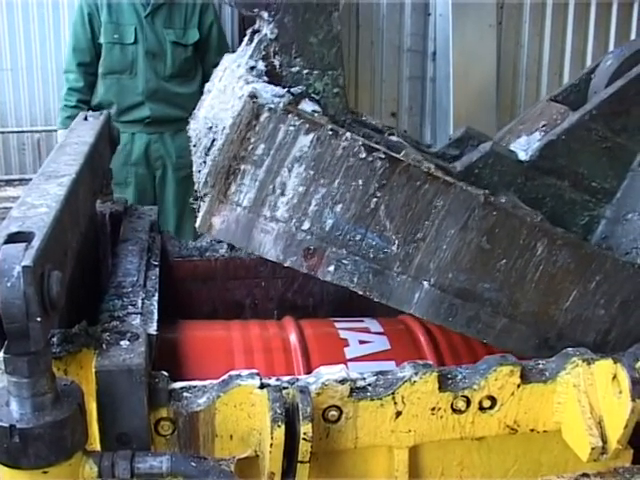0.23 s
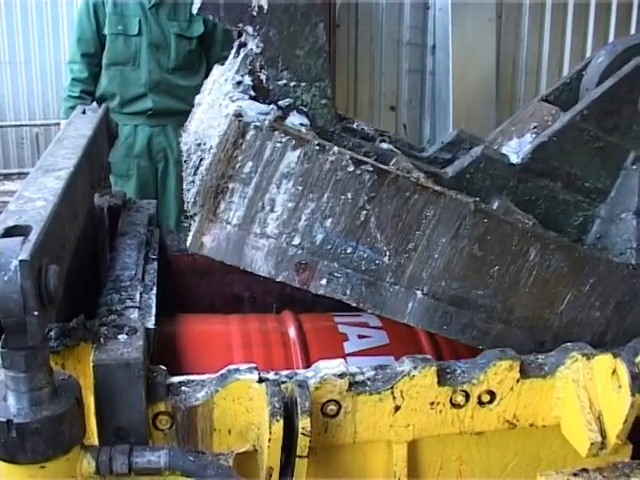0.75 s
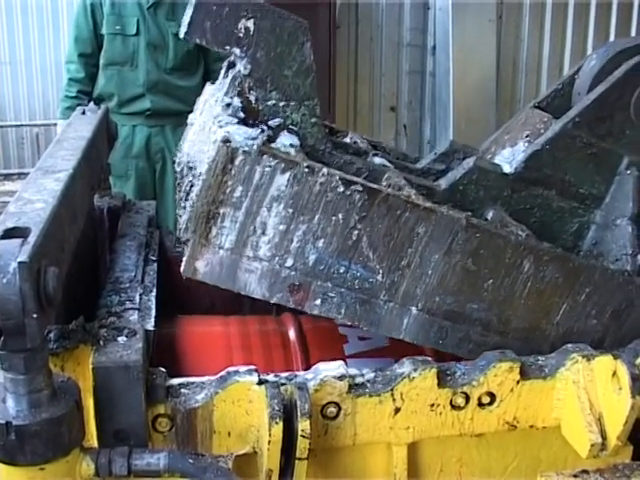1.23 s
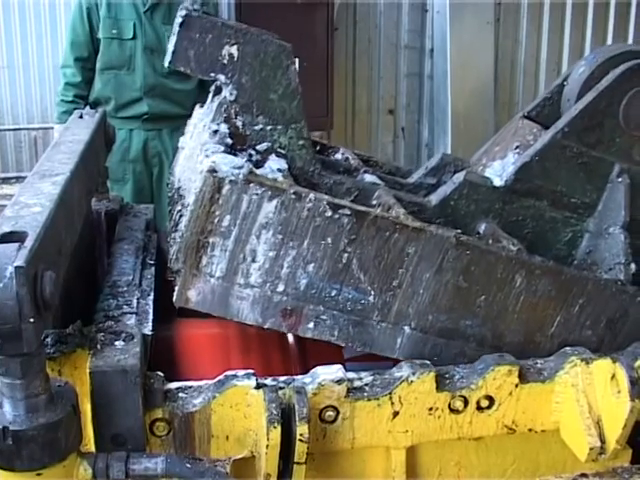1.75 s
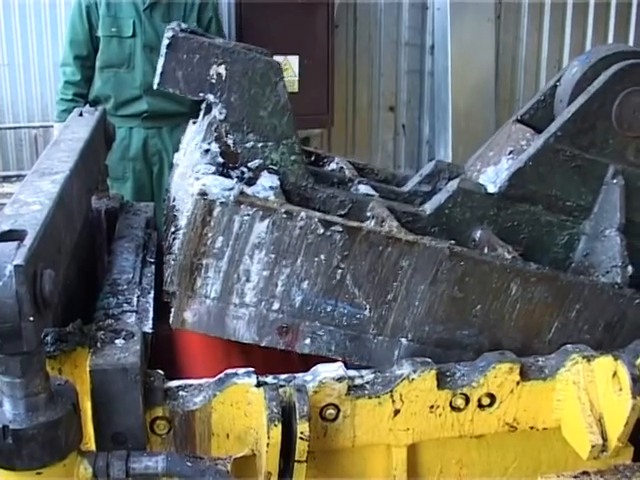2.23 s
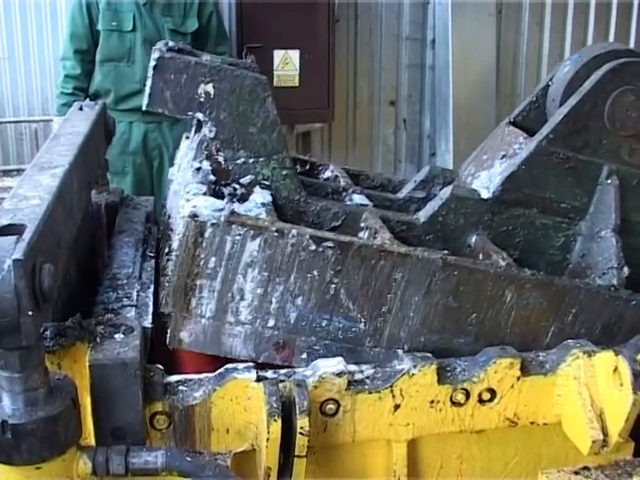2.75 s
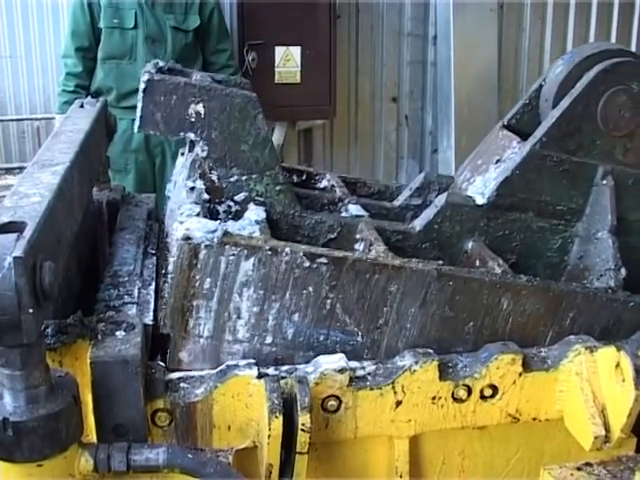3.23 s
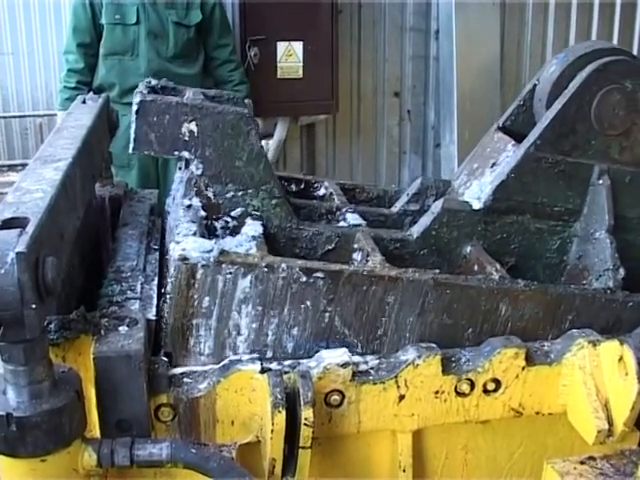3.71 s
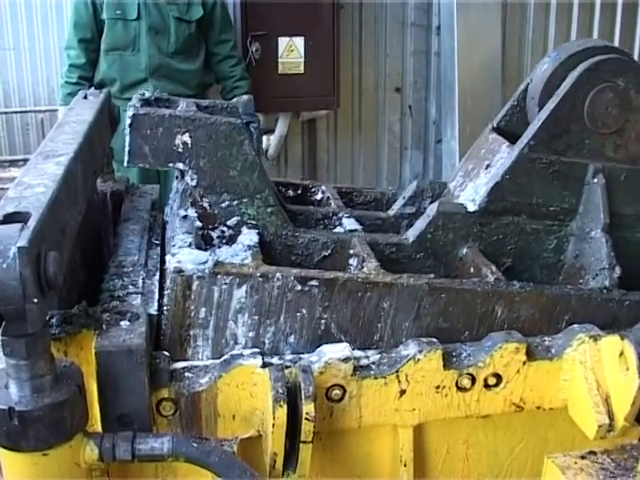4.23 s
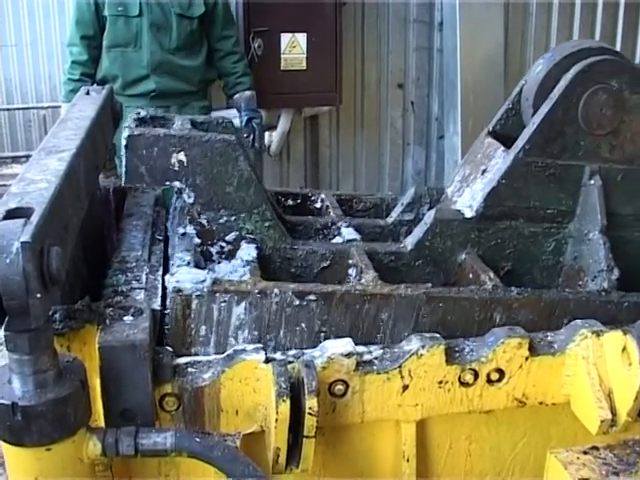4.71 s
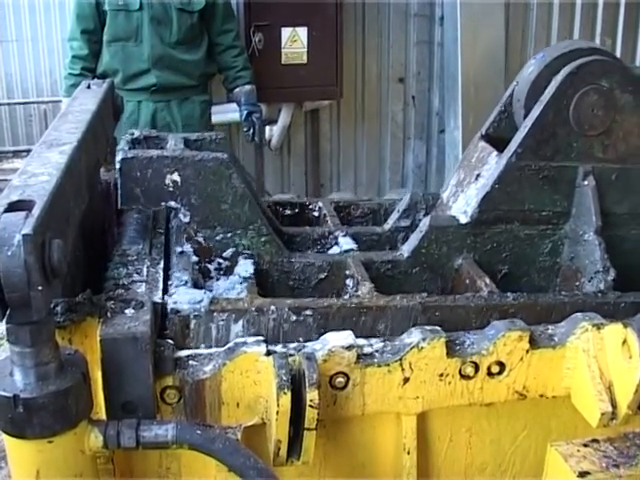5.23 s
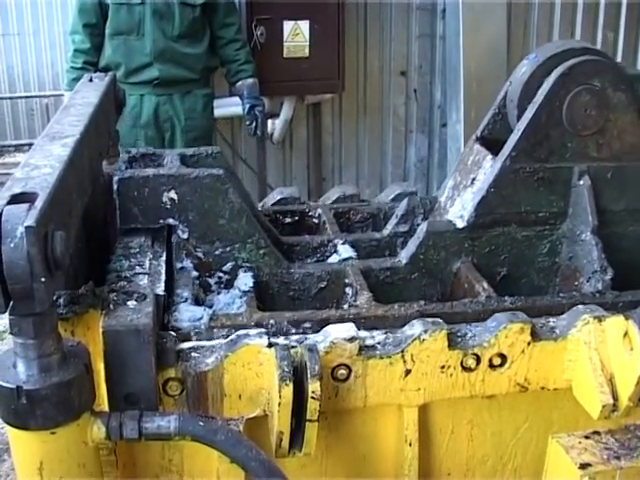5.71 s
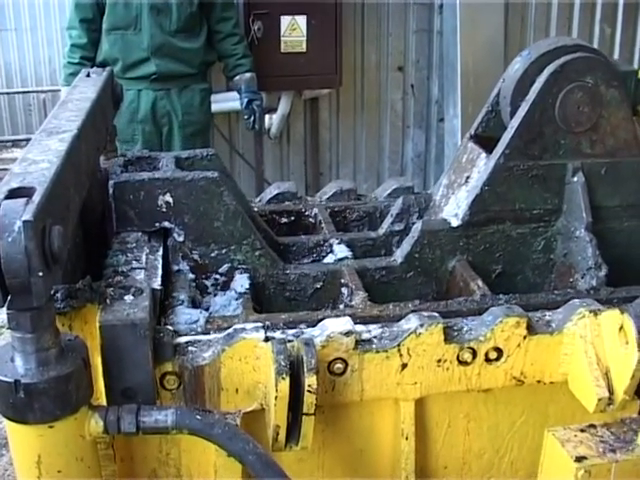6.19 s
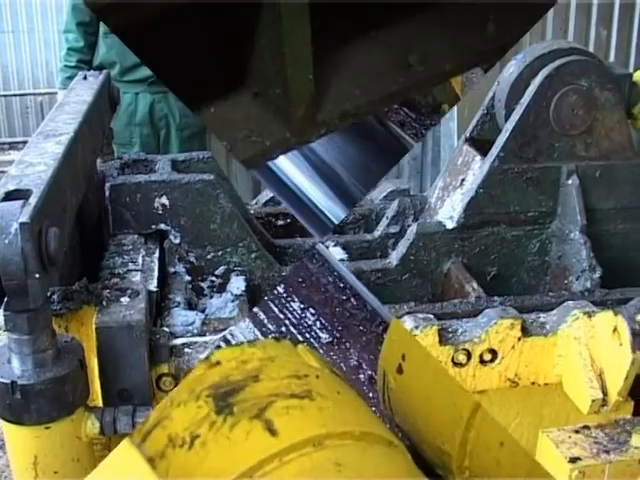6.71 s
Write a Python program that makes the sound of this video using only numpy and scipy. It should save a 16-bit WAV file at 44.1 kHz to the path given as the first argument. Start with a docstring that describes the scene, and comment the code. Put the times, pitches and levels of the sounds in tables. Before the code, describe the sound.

A scrap press closes its lid on a steel drum in a yard. Its pump and second shaft drone and whine steadily over hissing oil flow. After about four seconds light ticks and dull groans begin, then a bright crack opens a heavy metallic buckling knock. Sheet crinkles and snaps, a second multiple knock lands, a short bright hiss follows, and everything stops abruptly. Close, dry, mono pickup.

```python
"""A hydraulic scrap baler closes its lid on a steel drum.
A ten-stroke pump and a second, slightly slower shaft drone as harmonic series with added whines, over a rush
of oil made of filtered noise. The frame groans and knocks dully in wavering tones, and the drum ticks and
crinkles in noise bursts. Twice the drum buckles with a heavy knock of noise and decaying modes, the first
opened by a bright crack. A short hiss follows, and the sound ends abruptly."""
import sys
import numpy as np
from scipy.fft import rfft, irfft, next_fast_len
from scipy.io import wavfile
from scipy.ndimage import uniform_filter1d, minimum_filter1d, map_coordinates

SR = 44100
rng = np.random.default_rng(int(sys.argv[2]) if len(sys.argv) > 2 else 0)


def to_wav(s):
    """Save 16-bit WAV."""
    ch = np.atleast_2d(s).T  # columns
    pcm = np.round(np.clip(ch, -1, 1) * 32767)  # PCM
    wavfile.write(sys.argv[1], SR, pcm.astype(np.int16))


N = 306567

# Oil pressure, rising as the lid meets the drum: time_s, load (0-1)
PRESSURE_LOAD = [(0, 0), (1.5, 0.23), (4.3, 0.17), (4.95, .85), (6.3, 1)]
# Oil rush in the housing: frequency_hz, relative_density_db
HOUSING_BODY = [(25, -54), (70, -53.5), (100, -38.5), (130, -47.5), (162, -38), (180, -24), (215, -22.5),
                (300, -6.5), (450, -13.5), (650, -5), (800, 1.5), (1150, -9), (1650, -4.5), (2100, -14.5),
                (4400, -21.5), (6500, -38.5)]
# Resonances and dips of the housing: centre_hz, width_hz, gain_db
HOUSING_HUMPS = [(786, 77.8, 4.5), (902, 110, 5), (1477, 72, 7), (2702, 160, 6.5), (3080, 330, -4.5),
                 (3504, 146, 7.5), (3847, 200, 6.5), (4410, 160, 6), (5150, 860, -3.5), (5900, 350, 8)]
# Fizz in the pipes: frequency_hz, relative_density_db
PIPE_FIZZ = [(2940, -37.5), (5000, -7), (5390, -4.5), (5850, 1), (6220, -6), (6830, -17), (7660, -9),
             (8460, -22), (9210, -9), (10000, -19.5), (10700, -6.5), (11100, -8.5), (13100, -13.5),
             (14900, -25.5), (15500, -35.5)]
# Rumble of the strained frame: frequency_hz, relative_density_db
FRAME_STRAIN = [(50, -32), (100, -13.5), (160, -12.0), (230, 3.5), (500, 19.0), (900, -38.0)]
# Harmonics of the pump shaft, before trim: order (multiple of shaft rate), level_db
PUMP_ORDERS = [(14, -43), (24, -41), (25, -41), (28, -35), (30, -35), (32, -28), (33, -35), (36, -35),
               (40, -27), (41, -42), (42, -44), (45, -43), (47, -43), (48, -41), (49, -42), (60, -41),
               (64, -42), (70, -37), (80, -43), (100, -49), (110, -48), (120, -48), (130, -52), (150, -52),
               (160, -52)]
# Harmonics of the second shaft, before trim: order (multiple of shaft rate), level_db
MOTOR_ORDERS = [(12, -40), (13, -45), (15, -47), (16, -47), (27, -40), (28, -43), (30, -39), (32, -30),
                (34, -27), (36, -36), (40, -32), (44, -36), (45, -31), (60, -38), (80, -47)]
# Whines that follow the second shaft's speed, before trim: nominal_pitch_hz, level_db
MOTOR_WHINES = [(593, -42), (607, -43), (643, -40), (763, -33), (775, -37), (793, -31), (890, -37),
                (911, -31), (1002, -31), (1072, -37), (1443, -37), (1484, -37), (1888, -44), (2146, -48),
                (2714, -48)]
# Slowly beating pump overtones: order, level_db, depth (0-1), beat_period_s, first_crest_s
BEATING_ORDERS = [(20, -32, .5, .75, .17), (50, -30.5, .42, 1.03, 0)]
# Closing hiss: frequency_hz, relative_density_db
HISS_SPECTRUM = [(500, -22.5), (2000, 7.5), (4000, 4), (6500, -12), (9000, -12.5), (11000, -1.5),
                 (13000, -8), (15500, -15)]
# Groans and dull low knocks of the strained frame: start_s, level_db, pitch_hz
FRAME_GROANS_AND_KNOCKS = [(4.0, -35, 192), (4.31, -50, 105), (4.53, -45, 105), (4.745, -19.5, 400),
                           (4.872, -23.5, 115), (4.95, -20.5, 215), (5.08, -39.5, 150), (5.24, -28, 297),
                           (5.67, -45, 130), (5.77, -42, 110), (5.88, -43, 120), (5.93, -20, 236.3),
                           (5.96, -31, 175)]
# Single creases that snap: start_s, level_db, panel_ring_db (relative to the snap)
CREASE_SNAPS = [(4.098, -26, 2), (4.348, -30, -3), (4.885, -41, -0.5), (5.102, -33, 13.5),
                (5.279, -39, 15.5), (5.427, -32, -11), (5.705, -31.5, -4), (5.815, -36, -3)]
# Spells of crinkling sheet: start_s, length_s, level_db
CRINKLE_SPELLS = [(5.247, 0.16, -36.5), (5.66, 0.33, -42), (5.997, 0.079, -37.5)]
# Colour of snaps and crinkles: frequency_hz, relative_density_db
SNAP_SPECTRUM = [(800, -19), (2400, 7.5), (3200, 6.5), (4800, -4.5), (6000, -2), (8000, -9.5),
                 (11000, -6.5), (15000, -23.5)]
# Small panels between the folds: centre_hz, width_hz, gain_db
PANEL_MODES = [(2170, 70, -4), (2420, 90, -1), (2560, 70, -3), (3230, 160, 0), (4170, 120, -7)]
# Crack of the first buckle: frequency_hz, relative_density_db
CRACK_SPECTRUM = [(200, -9.5), (600, -0.5), (1200, 2), (2600, -10), (5000, -25), (9000, -41.5),
                  (15000, -40)]
# Jolts of the buckling drum: start_s, level_db, rise_s, t60_s, boom_db, brightness_db, thud_db
JOLTS = [(4.872, -7.5, .0004, 0.49, 1.5, -4, -48), (4.905, -11, .004, 0.5, -2, -5, -52),
         (4.935, -9, 0.0036, 0.57, 1, -6, -46), (5.21, -18, .005, 0.16, -2, -5.5, -54),
         (5.265, -21.5, .005, 0.18, -3, 5, -70), (6.033, -9.5, 0.0015, 0.3, -7, -3, -38.5),
         (6.056, -7.5, .001, 0.25, -9.5, -8, -35), (6.098, -11, .001, 1, -9.5, -8.5, -50)]
# Modes of the drum, before random spread: pitch_hz, level_db, t60_s
DRUM_MODES = [(235, -12, .3), (335, -6, .25), (430, -5, .25), (545, -7, .2), (625, -1, .3), (690, -1, .3),
              (760, -2, .3), (875, -1, .3), (1020, -4, .2), (1390, -10, .2), (1560, -12, .2),
              (2050, -15, .15), (2380, -14, .15)]
# Crumpling sheet: frequency_hz, relative_density_db
CRUMPLE_SPECTRUM = [(60, -36), (150, -21), (230, -9), (360, -1), (500, -2), (650, 4), (1000, 2), (1300, -6),
                    (1700, -10), (2400, -13), (4000, -27), (8000, -45), (15000, -58)]
# Thud of the frame: frequency_hz, relative_density_db
THUD_SPECTRUM = [(15, -4), (35, 0), (60, -4), (100, -6), (160, -11), (300, -30)]

PUMP_HZ, MOTOR_HZ = 24.92, 24.43  # nominal turns per second
STROKES = 10  # pump strokes in one turn
HUM_DB, HUM_GROWTH = -32, .62  # stroke hum: level at full load, exponent of the load
WHINE_ORDER, WHINE_DB, WHINE_LOAD_DB = 90, -43, 6.5  # high whine: order, idle level, rise at full load
RUSH_DB, RUSH_LOAD_DB = -25.5, 1.5  # oil rush: gain when idle, rise at full load
HISS_S, HISS_RISE_S, HISS_DB, HISS_SAG_DB_PER_S = 6.215, 0.049, -26.5, 50.5
GROAN_RISE_S, GROAN_T60_S = .025, 0.36
SNAP_RISE_S, SNAP_T60_S = .0007, 0.076
CRINKLE_UNEVEN_DB, CRINKLE_RATE_HZ, CRINKLE_RING_DB = 8, 40, 1.5  # flicker depth and rate, panel ring
CRACK_S, CRACK_DB, CRACK_T60_S = 4.8725, -5, 0.058
BOOM_HZ, BRIGHT_HZ = 513, 1100  # a jolt booms below the first and is bright above the second
THUD_T60_S = .33
END_S, FADE_S = 6.332, .022  # start and length of the final fade
TOP_HZ = 15800  # upper edge of the band


def amp(db):
    """Decibel law: a level in dB becomes an amplitude factor."""
    return 10 ** (np.asarray(db) / 20)


def unit(x):
    """Normalisation: equal mean power gives every signal an rms of 1."""
    return x / np.sqrt(np.mean(x ** 2) + 1e-20)


def along(points, hz):
    """Logarithmic pitch scale: interpolates (frequency_hz, value) points along it."""
    f, v = np.transpose(points)
    return np.interp(np.log(hz + 1), np.log(f + 1), v)


def curve(rows):
    """Linear interpolation: one value per sample from (time_s, value) rows."""
    return np.interp(np.arange(N) / SR, *np.transpose(rows))


def wobble(rate):
    """Slow random modulation: a smooth curve through rate random knots a second."""
    coarse = np.arange(0, N + 64, 64)
    knots = rng.standard_normal(int(N * rate / SR) + 4)
    smooth = map_coordinates(knots, [coarse * rate / SR])
    return np.interp(np.arange(N), coarse, smooth)


def filtered(x, response):
    """Linear filtering: the spectrum is multiplied by a response of frequency."""
    m = next_fast_len(N + SR // 4)
    return irfft(rfft(x, m) * response(np.fft.rfftfreq(m, 1 / SR)), m)[:N]


def noise(spectrum):
    """Coloured noise: white noise shaped by a spectrum, with an rms of 1."""
    return unit(filtered(rng.standard_normal(N), lambda hz: amp(along(spectrum, hz))))


def ramp(s, length):
    """Linear onset: rises from 0 to 1 over length seconds, starting at time s."""
    return np.clip((np.arange(N) / SR - s) / length, 0, 1)


def burst(s, rise, t60):
    """Damped impact: an exponential onset at time s, then a 60 dB decay in t60 seconds."""
    t = np.maximum(np.arange(N) / SR - s, 0)
    return (1 - np.exp(-t / rise)) * np.exp(-np.log(1000) * t / t60)


def resonances(f, modes):
    """Modal superposition: damped resonators respond in parallel."""
    return sum(amp(db) * 1j * f * width / (hz ** 2 - f ** 2 + 1j * f * width) for hz, width, db in modes)


def housing(hz):
    """Resonant transmission: the gain of the pump housing and tank over frequency."""
    humps = sum(db / (1 + (2 * (hz - centre) / width) ** 2) for centre, width, db in HOUSING_HUMPS)
    return amp(along(HOUSING_BODY, hz) + humps) / np.sqrt(1 + (hz / 6800) ** 16)


def oil(load):
    """Flow noise: oil rushes through the valves; under pressure it fizzes more and the frame rumbles."""
    rush = unit(filtered(rng.standard_normal(N), housing))
    fizz = noise(PIPE_FIZZ) * amp(-22.0 + load)
    strain = noise(FRAME_STRAIN) * amp(-51 + 20 * load + 2.77 * wobble(7))
    flicker_db = 0.29 * wobble(12) + .6 * wobble(160)
    flow = amp(RUSH_DB + RUSH_LOAD_DB * load + flicker_db)
    return flow * (amp(5) * rush + fizz) + strain


def tone(turns, swell_db, flutter):
    """Amplitude and phase modulation: a partial of rms 1 swells slowly and flutters quickly."""
    angle = 2 * np.pi * (turns + rng.random()) + flutter * wobble(14)
    return unit(amp(swell_db * wobble(2.526)) * np.sin(angle.astype(np.float32)))


def beat(depth, period, crest):
    """Interference: the gain of a tone that beats against a weaker neighbour."""
    return np.abs(1 + depth * np.exp(2j * np.pi * (np.arange(N) / SR - crest) / period))


def rattle(turns, size=2048):
    """Periodic excitation: the same uneven pattern of contacts recurs with every turn of a shaft."""
    pattern = rng.standard_normal(size)
    position = (turns * size).astype(int) % size
    return unit(filtered(pattern[position], housing))


def power_unit():
    """Harmonic series: both shafts sing their orders and rattle the housing; pressure loads the pump."""
    load = np.maximum(curve(PRESSURE_LOAD), 1e-3)
    pump_speed = 1 + .0003 * wobble(3) - .0006 * load * (1 + wobble(4))  # load slows the pump slightly
    motor_speed = 1 + .0005 * wobble(2)
    pump = np.cumsum(PUMP_HZ * pump_speed) / SR  # turns made so far
    motor = np.cumsum(MOTOR_HZ * motor_speed) / SR
    out = amp(-28.5) * (rattle(pump) + rattle(motor))
    out += amp(HUM_DB) * load ** HUM_GROWTH * tone(STROKES * pump, swell_db=0.0, flutter=.09)
    out += amp(WHINE_DB + WHINE_LOAD_DB * load) * tone(WHINE_ORDER * pump, swell_db=.5, flutter=0.22)
    for order, db, depth, period, crest in BEATING_ORDERS:
        out += amp(db) * beat(depth, period, crest) * tone(order * pump, swell_db=2.0, flutter=.09)
    for order, db in PUMP_ORDERS:
        brightening_db = 0.035 * order * (load - .25)  # pressure sharpens the strokes
        out += amp(db - 0.6 + brightening_db) * tone(order * pump, swell_db=-0.5, flutter=0.41)
    for order, db in MOTOR_ORDERS:
        out += amp(db - 0.74) * tone(order * motor, swell_db=3.0, flutter=0.53)
    for hz, db in MOTOR_WHINES:
        out += amp(db - .6) * tone(hz * motor / MOTOR_HZ, swell_db=2.2, flutter=.35)
    return out + oil(load)


def hiss():
    """Shaped broadband noise: a bright hiss swells after the last buckle, then sinks."""
    since_peak = np.maximum(np.arange(N) / SR - HISS_S - HISS_RISE_S, 0)
    level = ramp(HISS_S, HISS_RISE_S) * amp(HISS_DB - HISS_SAG_DB_PER_S * since_peak)
    return level * noise(HISS_SPECTRUM)


def groans_and_dull_knocks():
    """Phase modulation: the strained frame groans and knocks dully in rough tones that swell and die."""
    t = np.arange(N) / SR
    waver = .8 * wobble(50)  # radians, shared by all rows
    out = np.zeros(N)
    for s, db, hz in FRAME_GROANS_AND_KNOCKS:
        out += amp(db) * burst(s, GROAN_RISE_S, GROAN_T60_S) * np.sin(2 * np.pi * hz * t + waver)
    return out


def creases():
    """Stick-slip and resonance: folds snap or crinkle in tiny slips, and set small panels ringing."""
    spells = np.zeros(N)
    for s, length, db in CRINKLE_SPELLS:
        fall = 1 - ramp(s + length / 2, length / 2)
        spells += amp(db) * ramp(s, .015) * fall
    snap = spells * unit(amp(CRINKLE_UNEVEN_DB * wobble(CRINKLE_RATE_HZ)))
    ring = amp(CRINKLE_RING_DB) * snap
    for s, db, ring_db in CREASE_SNAPS:
        fold = amp(db) * burst(s, SNAP_RISE_S, SNAP_T60_S)
        snap += fold
        ring += amp(ring_db) * fold
    slips = unit(amp(2.5 * wobble(500)))
    panels = unit(filtered(slips * rng.standard_normal(N), lambda hz: resonances(hz, PANEL_MODES)))
    return snap * slips * noise(SNAP_SPECTRUM) + ring * panels


def crack():
    """Impulsive release: the first buckle starts with a hard, bright crack."""
    return amp(CRACK_DB) * burst(CRACK_S, .0002, CRACK_T60_S) * noise(CRACK_SPECTRUM)


def jolt_gain(hz, boom_db, bright_db):
    """Spectral balance: shelves set the boom and brightness of a jolt."""
    boom = boom_db / (1 + (hz / BOOM_HZ) ** 8)
    bright = bright_db * (1 - 1 / (1 + (hz / BRIGHT_HZ) ** 8))
    return amp(boom + bright)


def drum_ring(boom_db, bright_db):
    """Modal decay: half a second of the drum's damped modes, struck a little differently each time."""
    t = np.arange(SR // 2) / SR
    ring = np.zeros(len(t))
    for hz, db, t60 in DRUM_MODES:
        decay = amp(db + rng.normal(0, 4.4) - 60 * t / t60)
        ring += jolt_gain(hz, boom_db, bright_db) * decay * np.sin(2 * np.pi * (hz * t + rng.random()))
    return t, ring


def knocks():
    """Sudden buckling: in each jolt the sheet crumples and rings in its own colour, and the frame thuds."""
    out, frame = np.zeros((2, N))
    crumple = unit(amp(1.5 * wobble(110))) * noise(CRUMPLE_SPECTRUM)
    for s, db, rise, t60, boom_db, bright_db, thud_db in JOLTS:
        sheet = np.roll(crumple, rng.integers(N))  # a fresh stretch for every jolt
        sheet = filtered(sheet, lambda hz: jolt_gain(hz, boom_db, bright_db))
        out += amp(db) * burst(s, rise, t60) * sheet
        t, ring = drum_ring(boom_db, bright_db)
        out[round(s * SR):][:len(t)] += amp(db - 9) * ring * (1 - np.exp(-t / rise))
        frame += amp(thud_db) * burst(s, .004, THUD_T60_S)
    return out + frame * noise(THUD_SPECTRUM)


def scene():
    """Superposition: the sources add linearly into one channel."""
    return (power_unit() + hiss() + groans_and_dull_knocks() + creases() + crack() + knocks())[None]


def record(dry):
    """Peak limiting: a fast gain holds peaks at full scale, then come a quick fade and a band limit."""
    needed = 1 / np.maximum(np.abs(dry[0]), 1)
    gain = uniform_filter1d(minimum_filter1d(needed, size=129), size=129)
    fade = (1 - ramp(END_S, FADE_S)) ** 2
    return filtered(dry[0] * gain * fade, lambda hz: np.clip((TOP_HZ - hz) / 300, 0, 1))[None]


dry = scene()
out = record(dry)
to_wav(out)
```